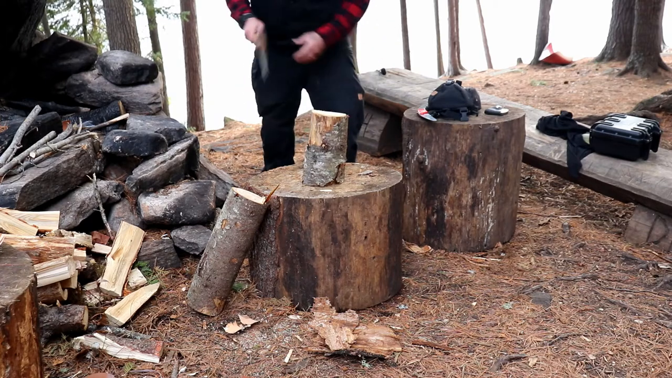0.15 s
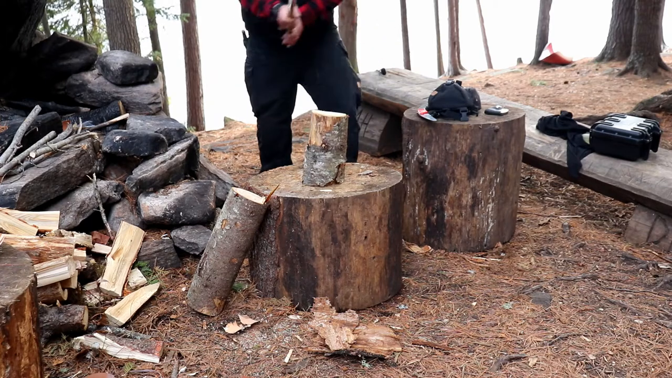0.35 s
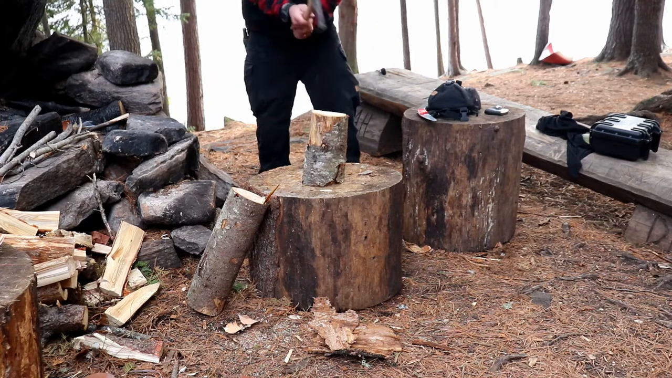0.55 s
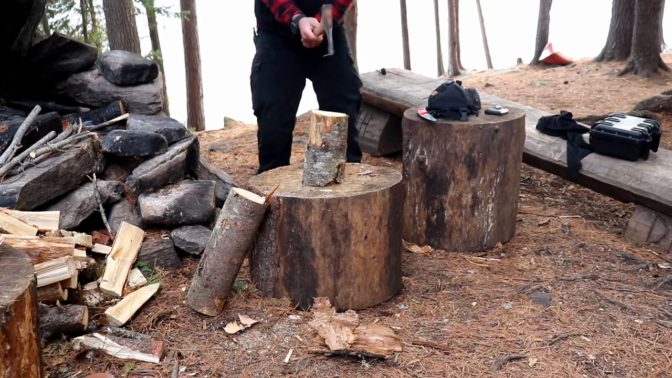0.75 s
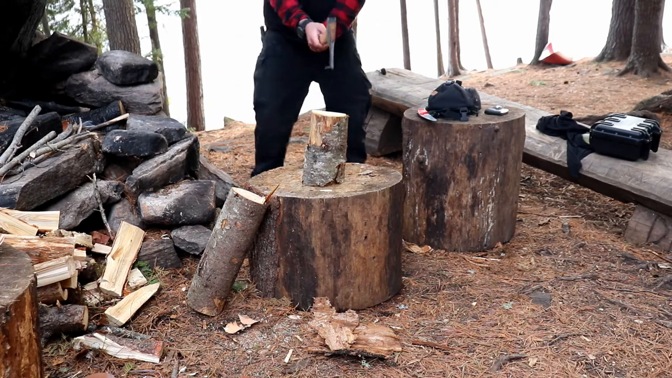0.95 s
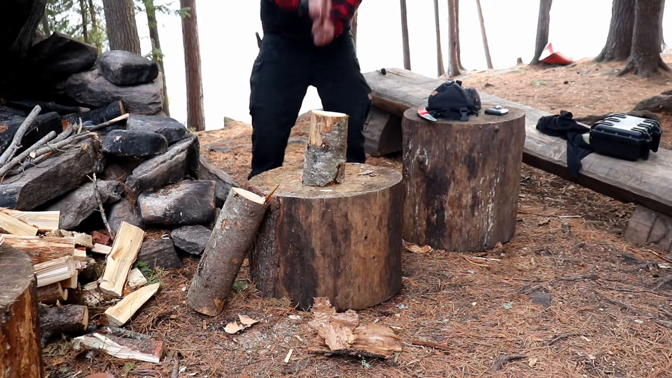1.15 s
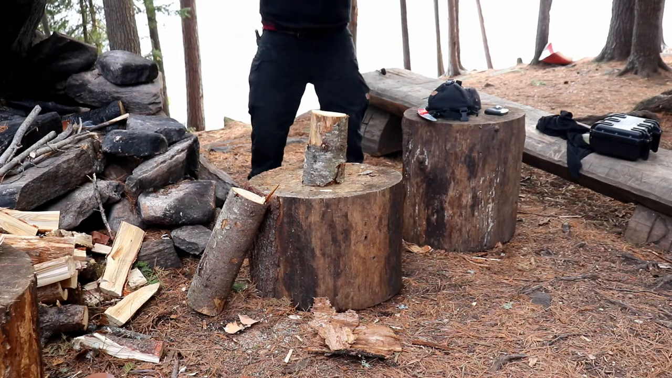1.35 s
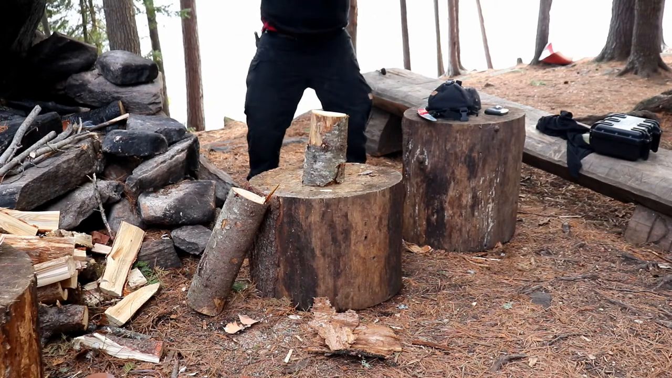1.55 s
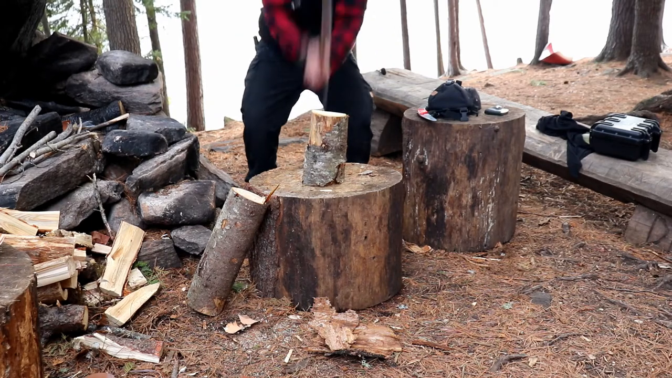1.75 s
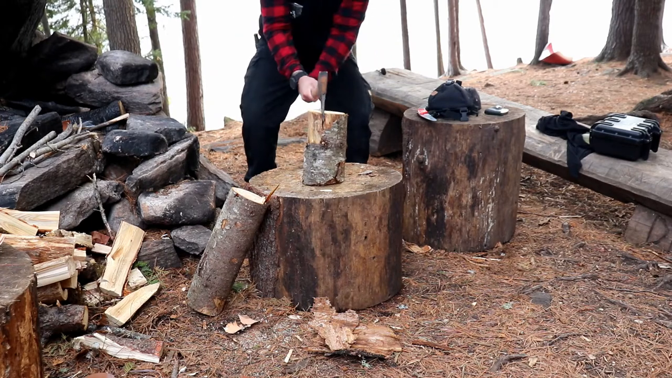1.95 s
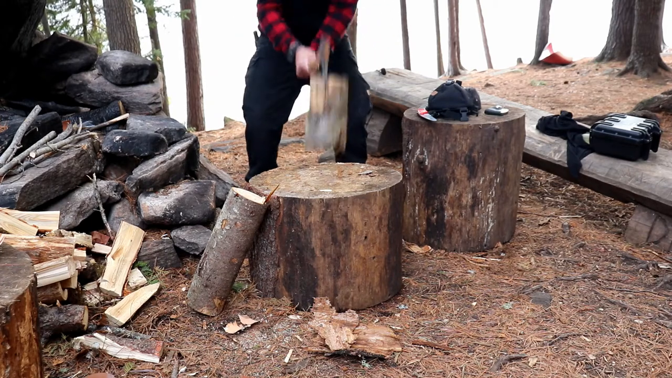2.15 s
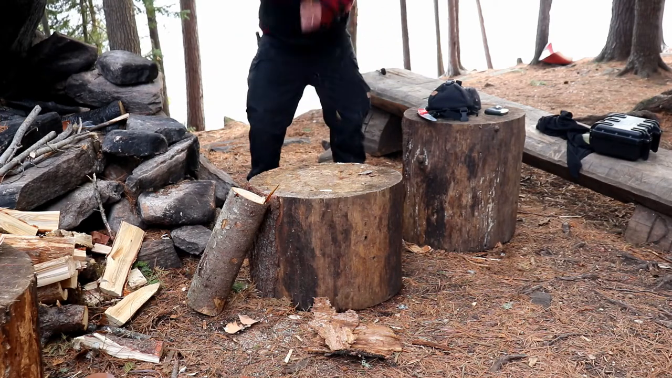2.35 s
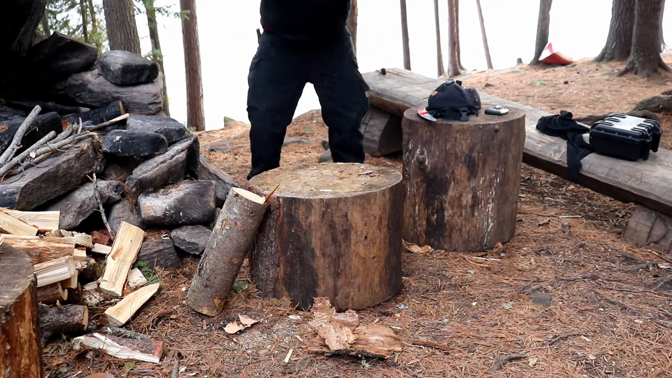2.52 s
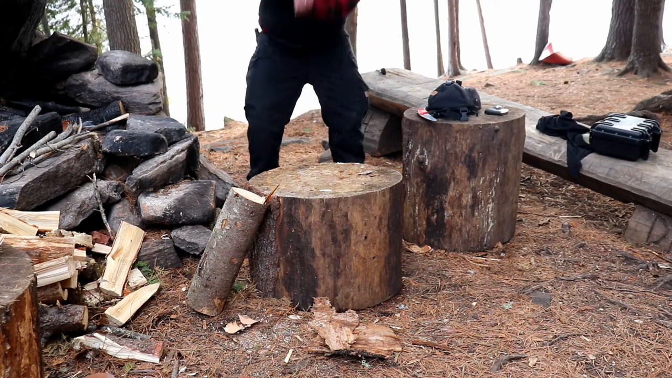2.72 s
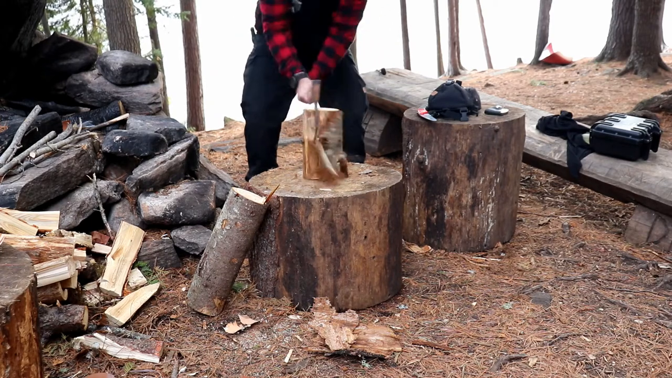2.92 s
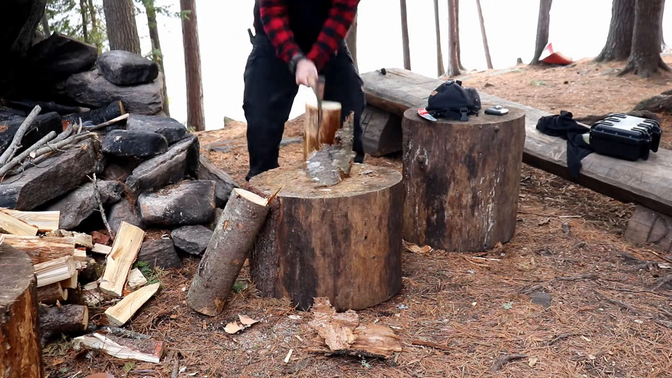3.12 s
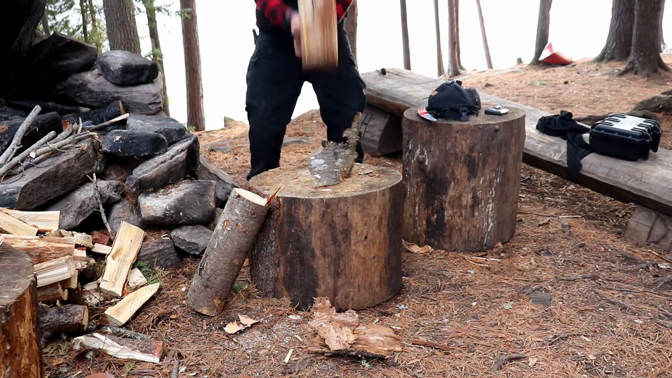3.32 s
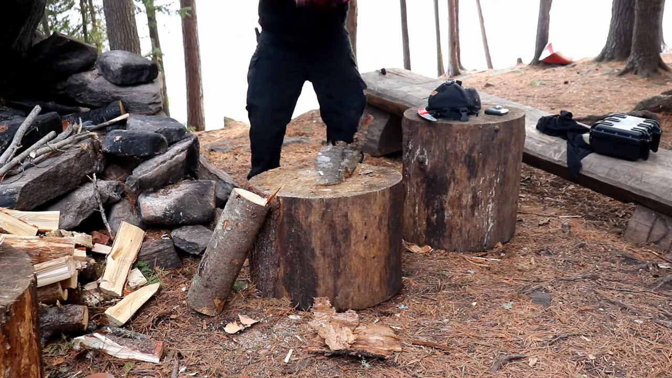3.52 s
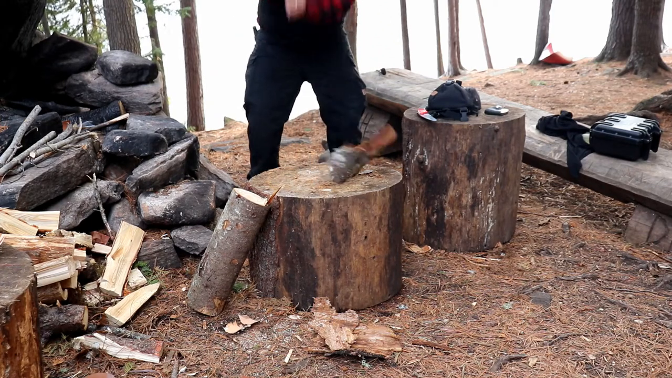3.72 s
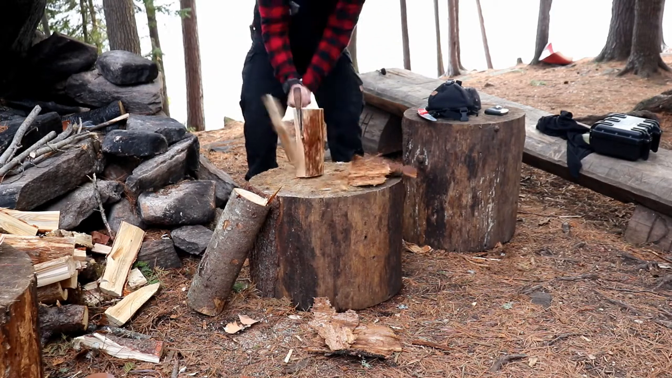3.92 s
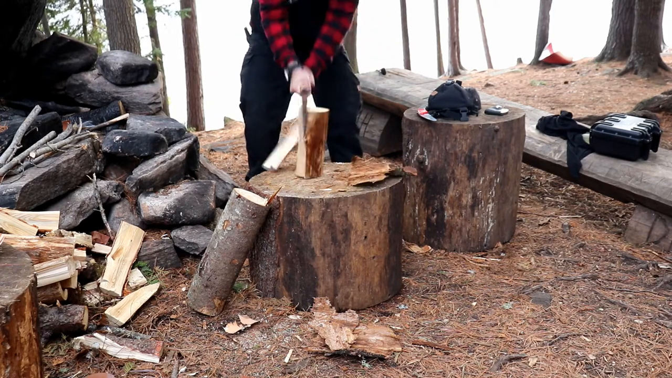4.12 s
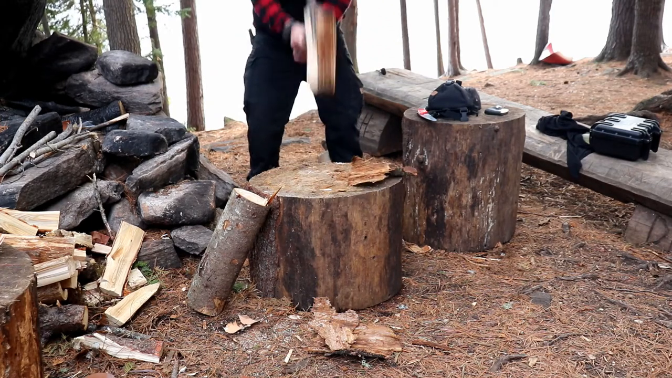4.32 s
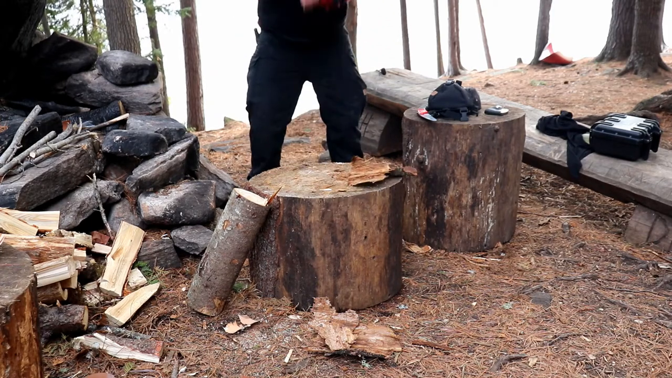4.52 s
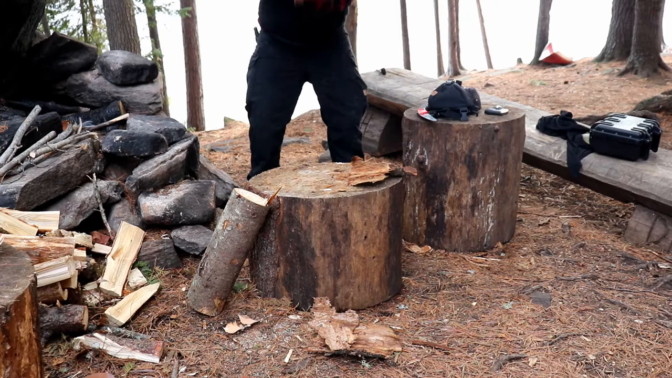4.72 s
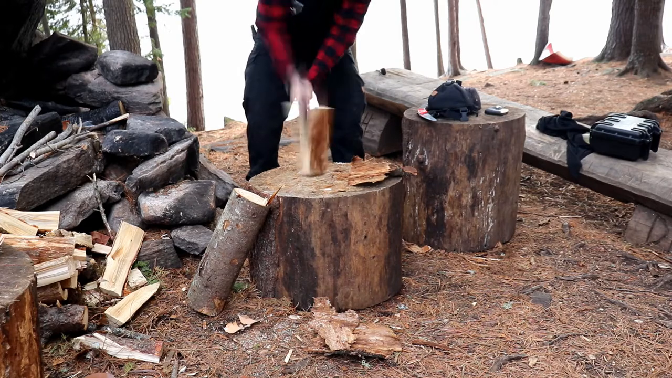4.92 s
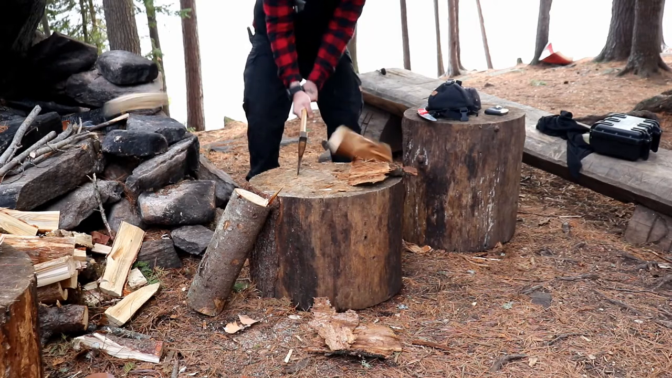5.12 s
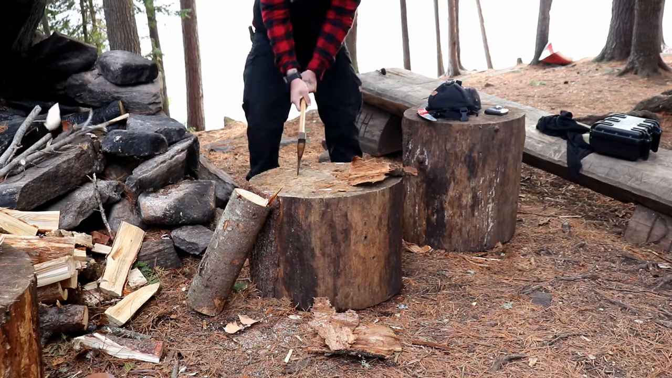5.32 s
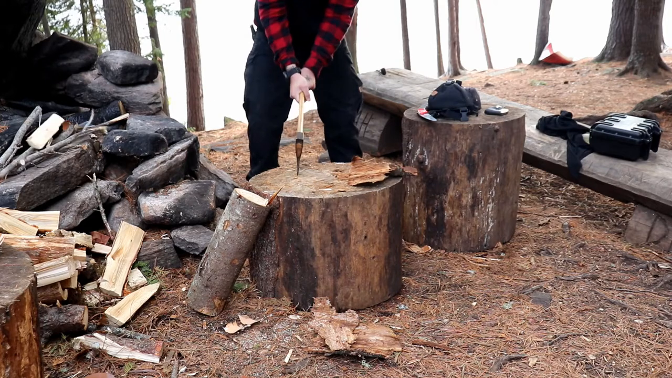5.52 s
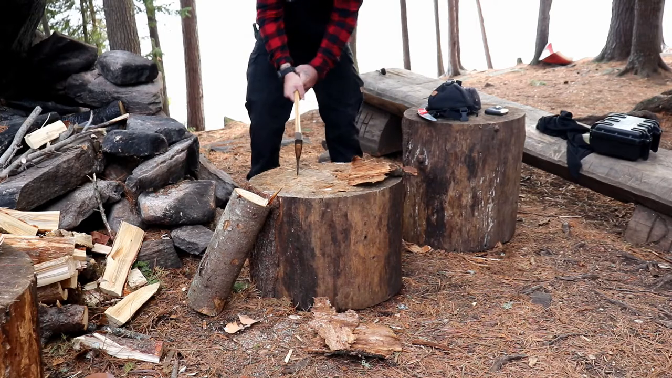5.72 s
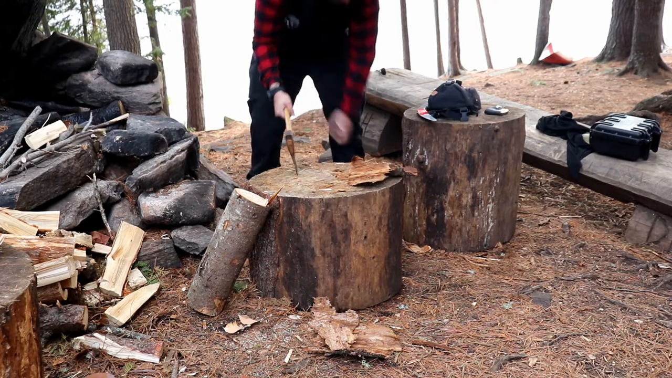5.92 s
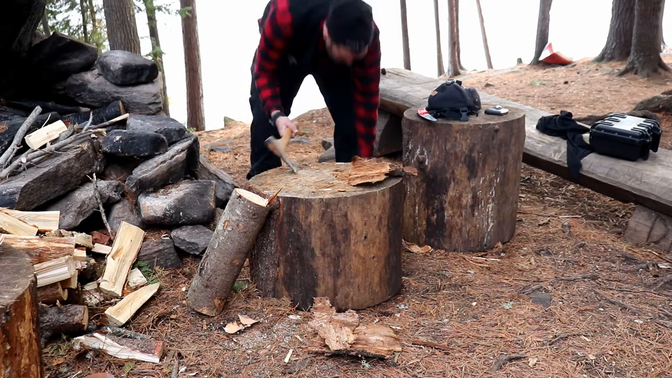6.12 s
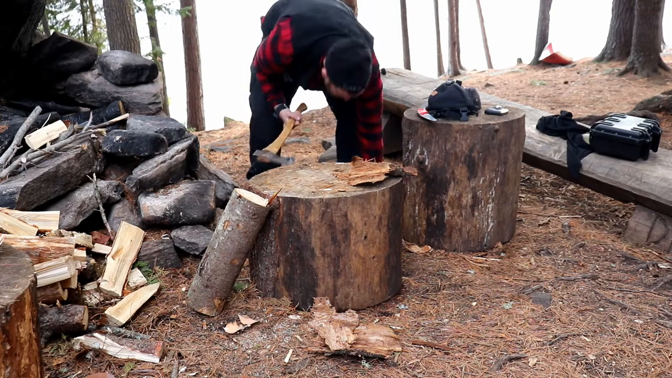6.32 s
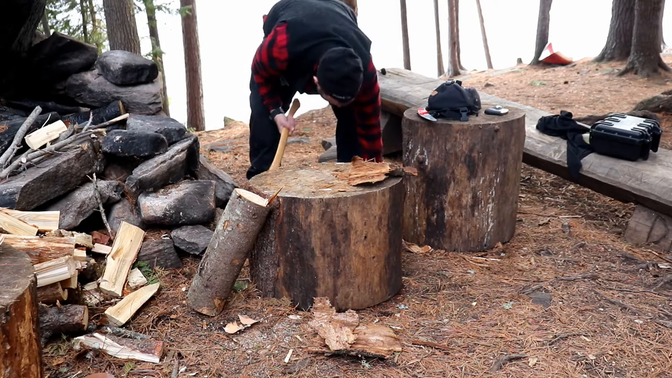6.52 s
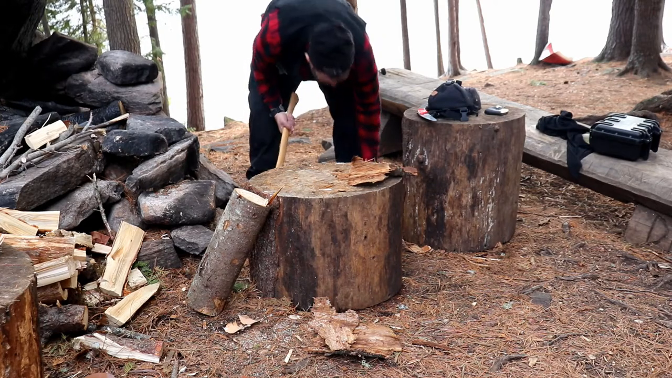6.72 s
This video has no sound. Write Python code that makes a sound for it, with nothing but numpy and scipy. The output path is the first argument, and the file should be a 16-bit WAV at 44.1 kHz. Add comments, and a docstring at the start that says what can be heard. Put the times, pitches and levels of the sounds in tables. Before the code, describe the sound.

Four sharp hatchet chops crack firewood apart in a forest clearing, followed by tumbling wood pieces and a faint scrape.

```python
"""A forest clearing, a small stereo microphone near a chopping stump. Wind puffs pop on its ports over
the hush of the treetops. From about 2 s a hatchet splits a short log in four blows, a second apart:
snapping fibres ring the wood, the microphone overloads and the trunks echo. From about 4 s split pieces
knock and thud down among ticking splinters. Last, the head is worked free and scraped over the stump."""
import sys
import numpy as np
from scipy import signal
from scipy.io import wavfile
from scipy.ndimage import uniform_filter1d

SR = 44100
rng = np.random.default_rng(int(sys.argv[2]) if len(sys.argv) > 2 else 0)


def store_pcm(level_fs):
    """Save levels as 16-bit WAV."""
    pcm = np.round(np.clip(level_fs, -1, 1) * 32767).astype(np.int16)
    wavfile.write(sys.argv[1], SR, np.atleast_2d(pcm).T)


N = 302834

# hatchet blows: t/s, force/dB, tearing time/s, how far the log is split/0-1, echo send/dB
BLOWS = [(1.9213, 14, 0.0084, 0.3, 5), (3.025, 22.5, 0.0054, 0.38, 5.5), (4.041, 19.5, 0.0061, 0.66, 4),
         (5.0749, 22, 0.0049, 0.74, 4.5)]
# modes of the log on the stump: f/Hz, level whole/dB, level split/dB, t60/s
LOG_MODES = [(230, -44, -15, 0.018), (463.7, -35, -13.5, 0.22), (624, -32.5, -18, 0.025),
             (982, 8.5, -37, 0.031), (1237, -5, 3.5, 0.024), (1565, 1.5, -1.5, 0.0065),
             (1870, -8, -14, 0.014), (2281, -1.5, -7, 0.012), (2820, 10, -8.5, 0.0025),
             (3380, -7.5, 4.5, 0.0012), (3500, -28.5, -7, 0.0056), (4490, -4.5, -6, 0.001),
             (5420, -15.5, -17, 0.0085)]
# split pieces landing on stump, stones and ground:
# t/s, ring peak/dB, ring f/Hz, ring t60/s, crack level/dB, crack decay/s, thud level/dB, left-right/dB
KNOCKS = [(3.977, -25, 1070, 0.014, -42, 0.033, -63, -1.5),
          (4.237, -9.5, 785, 0.017, -38, 0.0053, -51, -0.5), (4.247, -14.5, 478, 0.072, -50, .003, -57, 1),
          (4.342, -1.5, 1870, 0.017, -33, 0.0035, -50, -3),
          (4.595, -23.5, 415, 0.011, -41, 0.0032, -21.5, 1),
          (4.702, -32.5, 260, 0.014, -50.5, 0.011, -31, -1), (4.746, -32, 310, 0.066, -46, 0.0033, -41, 1),
          (4.879, -28.5, 288, 0.065, -38, 0.0044, -37, -1),
          (5.262, -20.5, 1290, 0.0033, -17, 0.0076, -27, -0.5),
          (5.382, -10, 697, 0.017, -24.5, 0.02, -44, 3), (5.421, -2, 1814, 0.0071, -18, 0.0045, -49, 5),
          (5.432, -13.5, 1200, 0.0042, -31, 0.027, -59, -1),
          (5.482, -14.5, 1500, 0.0025, -21.5, 0.012, -59, -2.5),
          (5.543, -11.5, 503, 0.015, -38, 0.0018, -24, 1.5), (5.569, -8, 580, 0.013, -25, 0.006, -15.5, 0.),
          (5.572, -13, 1850, 0.016, -43, .003, -48, 7.5), (5.661, -22.5, 772, 0.036, -40, .008, -38, 3),
          (5.684, -23.5, 300, 0.019, -35, 0.0045, -30, 1), (5.717, -29.5, 553, 0.04, -48, .003, -52, 1),
          (5.756, -21, 784, 0.047, -36, 0.0051, -43, 2), (5.797, -32, 109, 0.066, -56, .003, -40, -2),
          (5.881, -22, 87.6, 0.19, -52, 0.0055, -28, 1)]
# modes of the ground under a falling piece: f/Hz, level/dB, t60/s
GROUND_MODES = [(99, -4.5, 0.16), (158.5, -2.5, 0.077), (250, -5.5, 0.076)]
# splinters and bark ticking: t/s, peak/dB, f/Hz, ring/cycles, noise t60/s, left-right/dB
TICKS = [(3.596, -41.5, 4750, 8., 0.022, -5), (3.705, -24, 5450, 5., 0.013, -3),
         (4.292, -22.5, 7800, 2.5, 0.045, -1), (4.469, -29, 7000, 1.5, 0.0059, 0.),
         (4.659, -34.5, 2800, 2.5, 0.023, 2), (4.789, -38, 2740, 8., 0.03, 4),
         (4.841, -35, 4120, 1.2, 0.015, -3), (5.26, -10.5, 10100, 2.5, 0.015, -8),
         (5.746, -28, 5900, 4., 0.0091, 6), (5.971, -40, 4500, 2.5, 0.013, 13)]
# resonances of hatchet head and stump: f/Hz, width/Hz, level/dB
SCRAPE_MODES = [(463, 32, 11), (736, 92, -3), (1020, 180, -1.5), (1600, 30, -6), (2186, 37, 5),
                (3160, 50, -5), (6300, 65, -12), (7320, 27, -0.5)]
# the edge catching in the grain: t/s, level/dB
CATCHES = [(6.38, -47), (6.414, -31), (6.433, -43), (6.464, -40)]
# echo among the trunks: f/Hz, level/dB, t60/s
TRUNK_ECHO = [(152, -72.5, 0.98), (337, -46, 0.67), (760, -29, 0.68), (1200, -41.5, 0.85),
              (2160, -40.5, 0.91), (3030, -47.5, 0.88), (5400, -52.5, 0.8), (11200, -65.5, 0.55),
              (16000, -65, 0.12)]
# strongest wind puffs on the microphone ports: t/s, f/Hz, left level/dB, right level/dB
PUFFS = [(0.1508, 257, -29, -18.5), (0.1678, 220, -22, -19), (0.183, 228, -20, -8), (0.2042, 463, -34, -12),
         (0.2177, 255, -15, -9), (0.2306, 442, -24, -6), (0.239, 270, -25, -9), (0.2481, 288, -16, -4.5),
         (0.3196, 335, -19, -9), (0.36, 440, -18, -6.5), (0.378, 250, -28, -20), (0.528, 290, -23, -11.5),
         (0.5379, 228, -19.5, -10), (0.633, 286, -24, -20), (1.6643, 312, -25, -17),
         (1.688, 275, -22, -16.5), (1.7019, 250, -3.5, -9), (1.7167, 480, 3, -1), (1.7657, 276, -13.5, -22),
         (1.786, 327, -22, -15), (2.338, 369, -48, -25), (2.3817, 298, -20, -12.5),
         (2.7248, 212, -23.5, -20.5), (2.7404, 266, -26, -12), (2.7504, 297, -26, -24.5),
         (2.7736, 229, -32, -23), (2.856, 215, -36, -26), (2.8695, 276, -39, -25), (2.91, 292, -27, -17),
         (2.923, 304, -25, -9.5), (2.9654, 233, -28, -21), (2.978, 212, -30, -25), (3.017, 296, -24, -19),
         (3.1263, 280, -38, -19), (4.5008, 215, -41.5, -23), (4.51, 215, -30, -17)]
# gusts that scatter small puffs: start t/s, length/s, level at the right port/dB
GUSTS = [(0.255, 0.087, -39), (0.582, 0.11, -32), (1.383, .05, -34), (1.78, 0.047, -38), (2.357, 0.08, -31),
         (2.548, 0.067, -32), (2.681, 0.27, -32)]
# course of the wind rumble: t/s, level/dB, extra bass per octave below 120 Hz/dB
RUMBLE_COURSE = [(0, -62, 4), (.39, -52, -8), (.87, -63, 4), (1.35, -57.5, -3), (1.77, -44.5, -6),
                 (2.2, -75, -5), (2.3, -55, 2), (2.66, -50.5, -7), (2.9, -43, -7), (3.2, -54, 5),
                 (3.39, -56, 3), (3.79, -96, 7), (4.0, -51, -7), (4.58, -64, 5), (4.75, -50, -10),
                 (5.6, -55.5, -4), (5.776, -43, 7), (5.924, -57, 3), (6.32, -55.5, 14), (6.72, -55, 9),
                 (6.87, -53, 5)]
# spectrum of the wind rumble: f/Hz, level/dB
RUMBLE_SPECTRUM = [(20, 1), (40, 15.5), (70, 21), (110, 22.5), (200, 16.5), (400, 1.5), (900, -54)]
# clothes and needles rustling: middle t/s, peak/dB, length/s
RUSTLES = [(0.314, -77, 0.11), (.46, -75.5, 0.32), (0.696, -71.5, 0.14), (0.843, -69.5, 0.063),
           (.93, -74, 0.21), (1.093, -67.5, 0.052), (1.51, -75, .1), (2.644, -87, 0.067), (2.99, -68, 0.18),
           (3.884, -72, 0.097), (4.51, -75, 0.028), (4.598, -61.5, 0.027), (4.702, -62, 0.04),
           (4.843, -62.5, 0.012), (4.94, -70, 0.42), (5.675, -64.5, .045), (5.764, -67.5, 0.047),
           (5.887, -63, 0.018), (6.19, -71, 0.38)]
# spectrum of the rustle: f/Hz, level/dB
RUSTLE_SPECTRUM = [(900, 25), (2500, 23.5), (6000, 18.5), (10000, 11.5), (16000, 7)]
# hush of the treetops: f/Hz, spectral level/dB
TREETOP_SPECTRUM = [(59, -44), (100, -19), (229, -5), (301, -4), (423, -2), (619, -2), (870, -1.5),
                    (1680, -8), (1990, -11), (14000, -31), (15900, -36)]
# diffuse sound at the two ports: f/Hz, left-right correlation
PORT_LIKENESS = [(60, 0.13), (180, 0.8), (550, 0.8), (1650, -0.068), (4970, -0.0069), (15000, -0.024)]

TEAR_DB, TEAR_BAND_HZ = -9, (1500, 7000)   # fibres snapping
DIRECT_DB = -11   # a blow straight to the microphone, against what it sends into the trees
RING_IN_ECHO_DB = -29.5   # share of the low log modes in what the trees send back
DEAD_DB, GROUND_CUT_HZ = -0.5, 65   # dead overtones against a piece's ring; low cut of its thud
SCRAPE_DB, SLIDE_DB, CATCH_DECAY_S = -42, -60, 0.0038
STEEL_ABOVE_HZ = 1400   # higher resonances belong to the head
NEAR_TREES_DB, TREE_LINE_S = -7, 0.078   # few trunks stand close; most answer from the clearing's edge
SMALL_ECHO_DB = -20   # low-lying sounds are screened by stumps and stones
PUFF_HALF_CYCLES, PUFF_LAG_RAD = 0.38, 1.79   # half-length of a puff; phase lag at the sheltered port
FLUTTER_DB, FLUTTER_S = -2, 0.03   # finer turbulence around each puff
SMALL_PUFFS_PER_S, SMALL_PUFF_HZ, SHELTER_DB = 36, 260, -8   # the left port lies in the lee
TREETOPS_DB = -35
PORT_LAG_S = 3.5e-5   # the left port hears the stump this much sooner
LIMIT_DB, DUCK_DB_PER_DB, ATTACK_S, RELEASE_DB_PER_S = -2.5, 0.58, 0.025, 197   # gain control
BASS_CUT_HZ, TOP_STOP_HZ = 41, 16100


def hatchet_blow(force_db, tear_s, split):
    """Fibres snap in a dense run as the edge sinks in, and every snap rings the log.
    Returns the sound straight to the microphone and the plain bang that goes out to the trees."""
    t = np.arange(SR // 4) / SR
    sinking = 1 / (1 + np.exp(np.minimum((t - tear_s) / 0.0021, 50))) + 0.22 * np.exp(-t / 0.026)
    snaps = sinking * rng.standard_normal((2, len(t)))
    snaps *= from_db(3 * np.minimum(rng.exponential(1, len(t)), 3))   # a few snaps stand out
    tear_filter = signal.butter(1, TEAR_BAND_HZ, "band", fs=SR)
    stereo_snaps = snaps[0] + 0.65 * snaps[1] * [[1], [-1]]
    direct = from_db(TEAR_DB) * signal.lfilter(*tear_filter, stereo_snaps)
    push = signal.lfilter([1, -1], [1, -.93], snaps[0]) * 0.046   # snaps carry no bass
    push[0] += 1   # the edge bites
    bang = 1.0 * (t == 0)
    for hz, whole_db, split_db, t60 in LOG_MODES:
        gain = from_db(whole_db + split * (split_db - whole_db))
        direct += gain * ring(push, hz, t60)
        if hz < 1400:
            bang -= gain * from_db(RING_IN_ECHO_DB) * ring(t == 0, hz, min(t60, .02))
    return from_db(force_db + DIRECT_DB) * direct, from_db(force_db) * bang


def piece_knock(peak_db, hz, t60, crack_db, crack_s, thud_db):
    """A loose piece rings briefly with dead overtones, cracks at the contact and thumps the ground."""
    t = np.arange(SR // 4) / SR
    contact = rng.standard_normal(len(t)) * t / .0008 * np.exp(-t / 0.00067)   # rough faces meet
    dead = sum(gain * ring(contact, ratio * hz, cycles / hz)
               for gain, ratio, cycles in [(-.6, 1.45, 6), (.5, 2.2, 4), (-1, .75, 6)])
    wood = peak_one(ring(contact, hz, t60)) + from_db(DEAD_DB) * peak_one(dead)
    bright_noise = signal.lfilter([1, -1], [1, -.7], rng.standard_normal(len(t)))
    crack = bright_noise * np.exp(-t / crack_s) * np.minimum(t / 0.0012, 1)
    thud = sum(from_db(db) * ring(t == 0, low_hz, low_t60) for low_hz, db, low_t60 in GROUND_MODES)
    thud = signal.lfilter(*signal.butter(2, GROUND_CUT_HZ, "high", fs=SR), thud)
    return from_db(peak_db) * peak_one(wood) + from_db(crack_db) * crack + from_db(thud_db) * thud


def splinter_tick(peak_db, hz, cycles, t60):
    """A splinter ticks: a dying burst of noise in a wide resonance."""
    t = np.arange(SR // 10) / SR
    burst = rng.standard_normal(len(t)) * from_db(-60 * t / t60)
    return from_db(peak_db) * peak_one(ring(burst, hz, cycles / hz))


def head_scrape():
    """The head slides free with a thin hiss; on the stump, grit rings the steel and catches thump wood."""
    t = np.arange(N) / SR
    slide = from_db(SLIDE_DB) * swell(start_s=6.03, attack_s=0.034, hold_s=.25, release_s=.05)
    stroke = from_db(SCRAPE_DB) * swell(start_s=6.34, attack_s=0.042, hold_s=0.089, release_s=0.048)
    catches = sum(from_db(db) * (t > s) * np.exp(-np.abs(t - s) / CATCH_DECAY_S) for s, db in CATCHES)
    grit = rms_one(rng.standard_normal(N) * (rng.random(N) < 2500 / SR))   # 2500 clicks a second
    out = slide * rms_one(ring(grit, hz=4800, t60=0.0078))
    for hz, width_hz, level_db in SCRAPE_MODES:
        drive = grit * (stroke + 0.42 * catches if hz > STEEL_ABOVE_HZ else 0.66 * stroke + catches)
        out += from_db(level_db) * ring(drive, hz, 1.16 / width_hz) * width_hz * 0.001
    thumps = .12 * ring(grit * catches, hz=450, t60=0.0034)
    low_rub = 0.54 * stroke * rms_one(ring(grit, hz=79, t60=0.049))
    return out + thumps + low_rub


def trunk_echo(sound):
    """Thousands of trunk echoes: noise dying band by band, swelling as the far tree line answers."""
    t = np.arange(SR) / SR
    near_trees = (1 - np.exp(-t / 0.0033)) * from_db(NEAR_TREES_DB)
    tree_line = 1 - np.exp(-(t / TREE_LINE_S) ** 2)
    tail = sum(band * from_db(at_hz(TRUNK_ECHO, hz) - 60 * t / at_hz(TRUNK_ECHO, hz, column=2))
               for hz, band in diffuse_bands(SR))
    return signal.fftconvolve(sound[None], (near_trees + tree_line) * tail, axes=1)[:, :N]


def wind_pops():
    """Each eddy on the microphone is a pressure wiggle of about one cycle; the sheltered port trails."""
    puffs = PUFFS + small_puffs()
    out, phases = np.zeros((2, N)), rng.uniform(0, 2 * np.pi, len(puffs))
    t = np.arange(-600, 600) / SR
    for (s, hz, left_db, right_db), phase in zip(puffs, phases):
        cycles = t * hz
        lag = PUFF_LAG_RAD * np.array([[left_db < right_db], [left_db >= right_db]])
        wiggle = np.exp(-.5 * (cycles / PUFF_HALF_CYCLES) ** 2) * np.cos(2 * np.pi * cycles + phase - lag)
        add(out, s + t[0], wiggle * from_db([[left_db], [right_db]]))
    envelope = uniform_filter1d(np.abs(out), round(FLUTTER_S * SR), axis=1)
    flutter = signal.sosfilt(signal.butter(2, [90, 350], "band", fs=SR, output="sos"), rng.standard_normal(N))
    return out + from_db(FLUTTER_DB) * envelope * rms_one(flutter)


def small_puffs():
    """Each gust scatters weaker puffs of uneven pitch and strength; rows as in PUFFS."""
    rows = []
    for start_s, length_s, level_db in GUSTS:
        count = int(np.ceil(length_s * SMALL_PUFFS_PER_S))
        for when, pitch, strength, lee in rng.random((count, 4)):
            hz = SMALL_PUFF_HZ * 2 ** (pitch - .4)
            right_db = level_db + 10 * (strength - .5)
            rows.append((start_s + when * length_s, hz, right_db + 2 * lee * SHELTER_DB, right_db))
    return rows


def clearing_air():
    """Diffuse noise all round: treetop hush, lumpy wind rumble, the rustle of clothes and needles."""
    t = np.arange(N) / SR
    times, *columns = np.transpose(RUMBLE_COURSE)
    rumble_db, bass_db = (np.interp(t, times, column) for column in columns)
    rustling = sum(from_db(db) * np.exp(-4 * ((t - s) / length_s) ** 2) for s, db, length_s in RUSTLES)
    lumps_db, sway_db, out = 3.5 * drift(9), .7 * drift(1.5), 0
    for hz, band in diffuse_bands(N):
        treetops = from_db(TREETOPS_DB + at_hz(TREETOP_SPECTRUM, hz) + sway_db + 1.3 * drift(10))
        octaves_below = max(np.log2(120 / hz), 0)
        rumble = from_db(rumble_db + at_hz(RUMBLE_SPECTRUM, hz) + bass_db * octaves_below + lumps_db)
        rustle = rustling * from_db(at_hz(RUSTLE_SPECTRUM, hz))
        out += band * np.sqrt(treetops ** 2 + rumble ** 2 + rustle ** 2)
    return out


def diffuse_bands(size):
    """Half-octave bands of stereo noise, each as alike in both ports as diffuse sound is."""
    white, edges = rng.standard_normal((2, 2, size)), 22 * 2 ** np.arange(0, 9.9, .5)
    for k, (low, high) in enumerate(zip(edges, edges[1:])):
        bandpass = signal.butter(2, [low, high], "band", fs=SR, output="sos")
        mid, side = signal.sosfilt(bandpass, white[k % 2])
        hz = np.sqrt(low * high)
        alike = at_hz(PORT_LIKENESS, hz)
        yield hz, np.sqrt(1 + alike) * mid + np.sqrt(1 - alike) * side * [[1], [-1]]


def ring(clicks, hz, t60):
    """A unit click sets a sine of height 1 ringing, with a t60 of at least 2 ms."""
    r, w = from_db(-60 / (max(t60, .002) * SR)), 2 * np.pi * hz / SR
    return signal.lfilter([0, np.sin(w)], [1, -2 * r * np.cos(w), r * r], clicks + 1e-18)


def swell(start_s, attack_s, hold_s, release_s):
    """Rises, holds at 1 and falls away."""
    corners = start_s + np.cumsum([0, attack_s, hold_s, release_s])
    return np.interp(np.arange(N) / SR, corners, [0, 1, 1, 0]) ** 2


def drift(rate_hz):
    """Slow random wander of rms 1."""
    r = np.exp(-80 * np.pi * rate_hz / SR)   # one step every 40 samples
    slow = signal.lfilter([1], [1, -2 * r, r * r], rng.standard_normal(N // 40 + 2002))[2000:]
    return np.interp(np.arange(N) / 40, np.arange(len(slow)), rms_one(slow))


def add(out, s, sound, pan_db=0):
    """Places a sound at a time; positive pan is to the left."""
    i = round(s * SR)
    sound = np.atleast_2d(sound)[:, :N - i]
    out[:, i:i + sound.shape[1]] += sound * from_db([[pan_db / 2], [-pan_db / 2]])


def at_hz(table, hz, column=1):
    """A table column read on a log-frequency axis."""
    table = np.array(table)
    return np.interp(np.log(hz), np.log(table[:, 0]), table[:, column])


def from_db(db):
    """Decibels to gain."""
    return 10 ** (np.asarray(db) / 20)


def rms_one(x):
    """Scales to rms 1."""
    return x / np.sqrt(np.mean(x ** 2) + 1e-20)


def peak_one(x):
    """Scales to peak 1."""
    return x / np.abs(x).max()


def scene():
    """At the microphone: work at the stump, its echo from the trunks, wind on the ports, the air."""
    wood, to_trees, small = np.zeros((3, 2, N))
    for s, force_db, tear_s, split, echo_db in BLOWS:
        direct, bang = hatchet_blow(force_db, tear_s, split)
        add(wood, s, direct)
        add(to_trees, s, bang * from_db(echo_db))
    for s, *settings, pan_db in KNOCKS:
        add(small, s, piece_knock(*settings), pan_db)
    for s, *settings, pan_db in TICKS:
        add(small, s, splinter_tick(*settings), pan_db)
    small += head_scrape()
    wood += small
    wood[1] = np.interp(np.arange(N) - PORT_LAG_S * SR, np.arange(N), wood[1])
    to_trees += from_db(SMALL_ECHO_DB) * small
    return wood + trunk_echo(to_trees.mean(axis=0)) + wind_pops() + clearing_air()


def record(dry):
    """The microphone's gain control ducks a moment too late, so each blow clips; bass and top are cut."""
    over_db = np.maximum(20 * np.log10(np.abs(dry).max(axis=0) + 1e-9) - LIMIT_DB, 0)
    release_db = RELEASE_DB_PER_S * np.arange(N) / SR
    held_db = np.maximum.accumulate(over_db + release_db) - release_db
    r = np.exp(-1 / (ATTACK_S * SR))
    duck_db = DUCK_DB_PER_DB * signal.lfilter([1 - r], [1, -r], held_db)
    clipped = np.clip(dry * from_db(-duck_db), -.97, .97)
    thinned = signal.sosfilt(signal.butter(1, BASS_CUT_HZ, "high", fs=SR, output="sos"), clipped)
    return signal.sosfilt(signal.cheby2(14, 30, TOP_STOP_HZ, fs=SR, output="sos"), thinned)


dry = scene()
out = record(dry)
store_pcm(out)
```